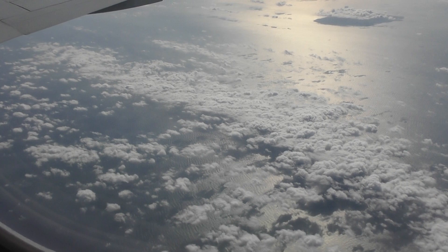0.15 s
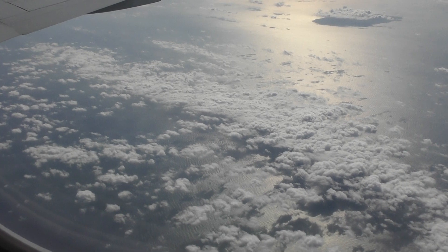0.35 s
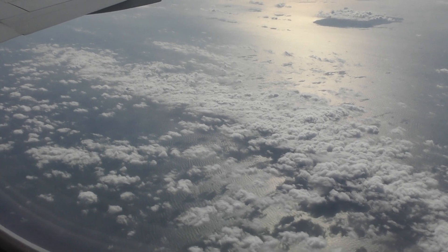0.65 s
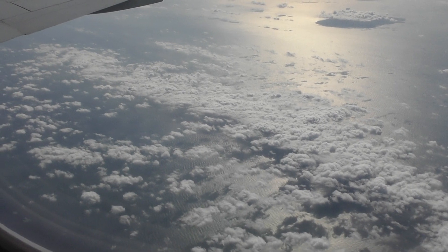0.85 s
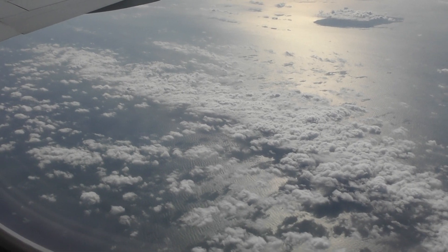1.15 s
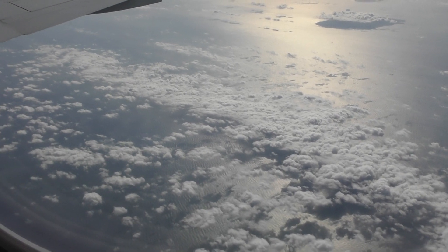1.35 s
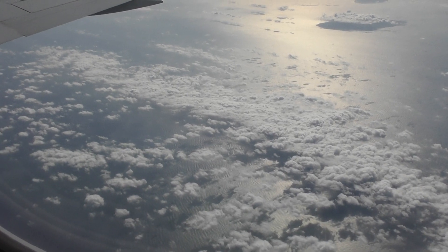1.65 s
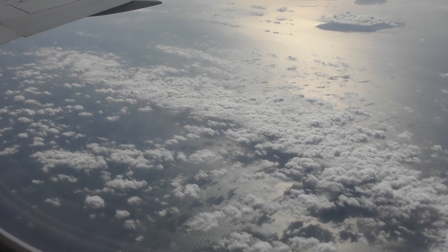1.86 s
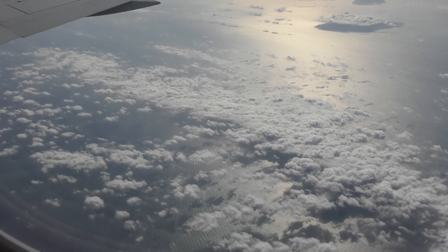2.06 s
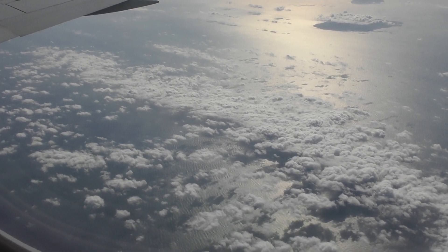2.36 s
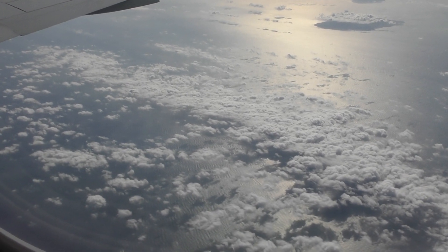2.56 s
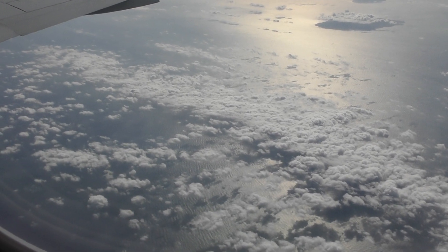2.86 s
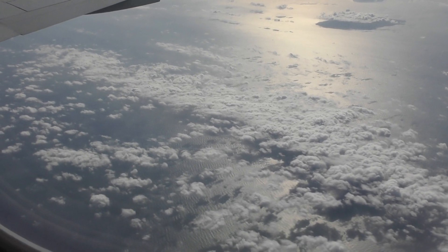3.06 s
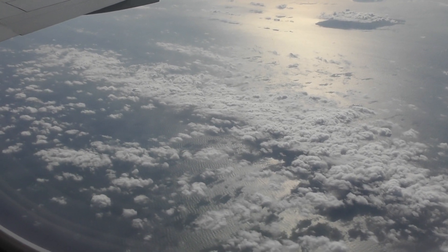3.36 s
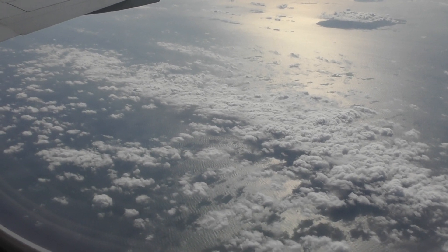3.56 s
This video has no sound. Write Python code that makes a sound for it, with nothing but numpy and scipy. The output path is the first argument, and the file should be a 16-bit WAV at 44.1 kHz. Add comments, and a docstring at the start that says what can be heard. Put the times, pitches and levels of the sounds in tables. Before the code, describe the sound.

A loud, steady low drone of jet engines and rushing air inside an airliner cabin runs throughout, boomy and muffled, concentrated around 100-350 Hz, slightly heavier on the right. Far beneath lies faint, even vent hiss. Barely perceptible rustles recur from 0.2 s; the whole level dips momentarily near 1.3 and 1.5 s. Nearly buried high pings follow from 1.8 s, with a thin squeak around 2.4-2.8 s.

```python
"""Inside an airliner cabin at cruise, by a window. From the start, engine roar and air rushing over the skin come
through the wall as noise shaped by its panel resonances, and the vents hiss evenly as broadband noise.
Small rustles, puffs of grainy noise, soon begin nearby; then the whole level dips briefly, twice.
Faint pings, short pure tones, follow, and later a thin squeak, a sine of wandering pitch.
A small stereo microphone hears it all, nearer the wall on its right."""
import sys
import numpy as np
from scipy import signal
from scipy.fft import rfft, irfft, next_fast_len
from scipy.io import wavfile
from scipy.ndimage import uniform_filter1d, map_coordinates

SR = 44100
rng = np.random.default_rng(int(sys.argv[2]) if len(sys.argv) > 2 else 0)


def volts(x):
    """Linear amplitude factor 10**(x/20) for a level x in dB, scalar or array-like."""
    e = np.asarray(x, float) / 20
    return 10 ** e


def transcribe(signal):
    """Save signal, clipped to [-1, 1], as a 16-bit WAV file at the path in sys.argv[1]."""
    frames = np.atleast_2d(signal).T
    limited = np.clip(frames, -1, 1)
    pcm = np.round(limited * 32767).astype(np.int16)
    wavfile.write(sys.argv[1], SR, pcm)


N = 163170  # samples

# Wall and cabin resonances: (frequency [Hz], width [Hz], relative peak level [dB])
PANEL_RESONANCES = [(144.9, 13.8, 0.5), (169.5, 24, -4.5), (194.5, 37, -9.5), (237, 45, -7),
                    (292.4, 26, -14), (321.4, 22, -14.5), (347.1, 25.2, -9.5), (471.4, 90, -29),
                    (610, 110, -33), (768, 46, -33.5), (802.5, 24, -28.5)]
# Roar between the resonances: (frequency [Hz], relative density [dB per Hz])
ROAR_FLOOR = [(20, -47.5), (50, -40.5), (100, -18), (200, -17.5), (380, -38), (700, -39.5), (850, -42.5),
              (1200, -49.5), (2000, -63), (3500, -80.5), (5000, -120)]
# Likeness of the roar at left and right: (frequency [Hz], correlation [1])
ROAR_LIKENESS = [(30, 0.98), (70, 0.81), (130, 1), (300, 0.96), (600, 1), (900, .88), (1300, .7),
                 (2200, .4)]
# Balance of the roar: (frequency [Hz], left minus right [dB])
ROAR_BALANCE = [(30, -3), (100, -3), (160, -4), (450, -3), (780, -7), (1300, -3), (2200, -1.5)]
# Phase of the roar: (frequency [Hz], lead of left over right [rad])
ROAR_PHASE = [(30, -.6), (70, -0.54), (150, 0.01), (430, -.4), (780, 0.39), (1120, -0.00093), (1800, .6),
              (3300, -0.1)]
# Spectrum of the vent hiss: (frequency [Hz], relative density [dB per Hz])
VENT_SPECTRUM = [(800, -120), (1500, -8), (2500, -1), (4000, -5), (6000, -9), (9000, -9), (11000, -14),
                 (13000, -18.5), (15500, -23.5), (17000, -38.5)]
# Likeness of the hiss at left and right: (frequency [Hz], correlation [1])
VENT_LIKENESS = [(2000, .4), (3300, .55), (5000, .82), (6000, .93), (7600, .95), (8600, .8), (11000, .78),
                 (15000, .6)]
# Balance of the hiss: (frequency [Hz], left minus right [dB])
VENT_BALANCE = [(2000, -1), (4000, -.4), (9000, 0), (15000, .2)]
# Phase of the hiss: (frequency [Hz], lead of left over right [rad])
VENT_PHASE = [(2000, .3), (3400, 0.31), (5000, .05)]
# Course of the hiss: (time [s], level [dB])
VENT_LEVEL = [(0, -62.5), (.5, -62), (.8, -63.5), (1.2, -62), (1.42, -61.5), (1.7, -62.5), (2.1, -62),
              (2.4, -62.5), (2.75, -61), (3.1, -62), (3.7, -64.5)]
# Rustles nearby: (time of peak [s], length [s], centre frequency [Hz], width [octaves], level [dB])
RUSTLE_EVENTS = [(.22, .06, 11000, .5, -72), (.42, .06, 7500, .4, -69), (.53, .08, 3000, .6, -65),
                 (.92, .07, 7800, .2, -69), (1.4, .12, 6000, .6, -66), (1.95, .06, 5000, .8, -68),
                 (2.17, .05, 4800, .9, -61), (2.512, .018, 11500, .35, -65), (2.64, .025, 7000, .8, -63),
                 (2.72, .22, 3600, .6, -67), (3.03, .03, 6500, .6, -65), (3.22, .07, 5500, .9, -66)]
# Dips of the whole level: (time [s], half length [s], depth [dB])
LEVEL_DIPS = [(1.27, .02, 2), (1.53, .03, 5)]
# Faint pings: (time [s], length [s], frequency [Hz], level [dB])
PING_EVENTS = [(1.77, .09, 4620, -76), (2.21, .07, 4620, -78), (2.63, .04, 11000, -74),
               (3.03, .03, 5600, -71), (3.2, .07, 3650, -73), (3.34, .08, 4620, -75)]
# Course of the squeak: (time [s], frequency [Hz], level [dB])
SQUEAK_COURSE = [(2.385, 12600, -95), (2.41, 13200, -74), (2.45, 13400, -76), (2.478, 14200, -79),
                 (2.51, 13500, -80), (2.53, 13700, -98), (2.57, 14000, -80), (2.6, 14300, -86),
                 (2.63, 14000, -98), (2.67, 14150, -79), (2.69, 13700, -83), (2.715, 13700, -79),
                 (2.735, 12600, -80), (2.77, 12300, -88)]


def unit(x):
    """Normalisation to an rms value of 1."""
    return x / np.sqrt(np.mean(x ** 2) + 1e-20)


def along(points, hz):
    """Interpolation of (frequency, value) points on a logarithmic frequency axis."""
    f, v = np.transpose(points)
    return np.interp(np.log(hz + 1), np.log(f + 1), v)


def curves(rows):
    """Linear interpolation in time: one value per sample for each column after the time."""
    s, *columns = np.transpose(rows)
    return [np.interp(np.arange(N) / SR, s, column) for column in columns]


def bump(s, half):
    """Gaussian envelope of height 1, fallen to 1/e at half seconds on either side of s."""
    return np.exp(-((np.arange(N) / SR - s) / half) ** 2)


def filtered(x, response):
    """Linear filtering: the spectrum is multiplied by a complex frequency response."""
    size = next_fast_len(N + SR // 2)
    spectrum = rfft(x, size) * response(np.fft.rfftfreq(size, 1 / SR))
    return irfft(spectrum, size)[..., :N]


def rush(gain, likeness, balance, phase, patchy_db):
    """Partial coherence: mid and side noises share power so that left and right correlate as given; rms 1."""
    noise = signal.stft(rng.standard_normal((2, N)), nperseg=512)[2]
    # random gain, smoothed over frequency and then time, leaves patches in the noise
    patches = uniform_filter1d(rng.standard_normal(noise.shape[1:]), size=8, axis=0)
    patches = unit(uniform_filter1d(patches, size=10, axis=1))
    pair = signal.istft(noise * volts(patchy_db * patches), nperseg=512)[1][:, :N]

    def mid_side(hz):
        # cos(angle)^2 - sin(angle)^2 equals the wanted correlation
        angle = np.arccos(np.clip(along(likeness, hz), -1, 1)) / 2
        return gain(hz) * [np.cos(angle), np.sin(angle)]

    def left_right(hz):
        # each channel takes half of the level and phase difference
        tilt = volts(along(balance, hz) / 2) * np.exp(.5j * along(phase, hz))
        return np.array([tilt, 1 / tilt])

    mid, side = filtered(pair, mid_side)
    return unit(filtered(np.array([mid + side, mid - side]), left_right))


def roar():
    """Forced resonance: broad engine and airflow noise is reinforced at the modes of the wall panels."""
    level_db, sway_db, patchy_db = -15.5, .3, .3
    skirt = 1.653  # exponent: steepness of the resonance flanks

    def wall(f):
        power = volts(along(ROAR_FLOOR, f)) ** 2
        for hz, width, db in PANEL_RESONANCES:
            power = power + volts(db) ** 2 / (1 + (2 * (f - hz) / width) ** 2) ** skirt
        return np.sqrt(power)

    # slow random level, two points a second joined smoothly
    sway = map_coordinates(rng.standard_normal(N // SR * 2 + 6), [np.arange(N) * 2 / SR])
    noise = rush(wall, ROAR_LIKENESS, ROAR_BALANCE, ROAR_PHASE, patchy_db)
    return volts(level_db + sway_db * sway) * noise


def vents():
    """Flow noise: cabin air gives a fine broadband hiss of nearly steady level."""
    level_db, = curves(VENT_LEVEL)
    hiss = rush(lambda f: volts(along(VENT_SPECTRUM, f)), VENT_LIKENESS, VENT_BALANCE, VENT_PHASE, patchy_db=.7)
    return volts(level_db) * hiss


def rustles():
    """Impulsive noise: uneven grains, each puff coloured by a band-pass and shaped by a short envelope."""
    out = np.zeros(N)
    for s, length, centre, octaves, db in RUSTLE_EVENTS:
        grit = rng.standard_normal(N) * rng.exponential(size=N)
        band = lambda f: np.exp(-(np.log2((f + 1) / centre) / octaves) ** 2)
        out += volts(db) * bump(s, length / 2) * unit(filtered(grit, band))
    return out


def level_dips():
    """Amplitude modulation: a gain that falls briefly and smoothly at each dip."""
    depth_db = sum(depth * bump(s, half) for s, half, depth in LEVEL_DIPS)
    return volts(-depth_db)


def pings():
    """Pure tones: sines of fixed frequency under short envelopes with soft ends."""
    t = np.arange(N) / SR
    out = np.zeros(N)
    for s, length, hz, db in PING_EVENTS:
        tone = np.sqrt(2) * np.sin(2 * np.pi * hz * t)  # rms 1
        out += volts(db) * bump(s + length / 2, length / 2) * tone
    return out


def squeak():
    """Frequency modulation: the phase of a thin, high sine is the running sum of its wandering frequency."""
    hz, db = curves(SQUEAK_COURSE)
    start, end = SQUEAK_COURSE[0][0], SQUEAK_COURSE[-1][0]
    sounding = np.abs(np.arange(N) / SR - (start + end) / 2) < (end - start) / 2
    tone = np.sqrt(2) * np.sin(2 * np.pi * np.cumsum(hz) / SR)  # rms 1
    return sounding * volts(db) * tone


def scene():
    """Superposition: all sources add at the window seat, the small ones equally in both channels."""
    return roar() + vents() + rustles() + pings() + squeak()


def band_limit(x):
    """A steep low-pass at the top of the band."""
    return signal.sosfilt(signal.butter(12, 15710, fs=SR, output="sos"), x)


def record(dry):
    """Common gain: both channels dip together, so the stereo image holds."""
    mix = dry * level_dips()
    return band_limit(mix)


dry = scene()
out = record(dry)
transcribe(out)
```